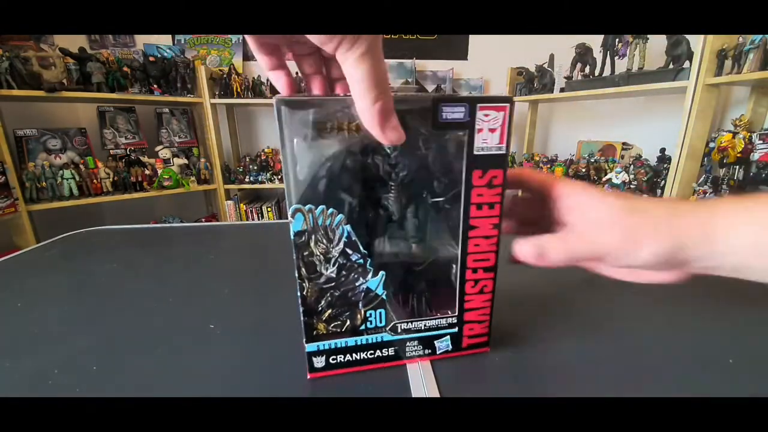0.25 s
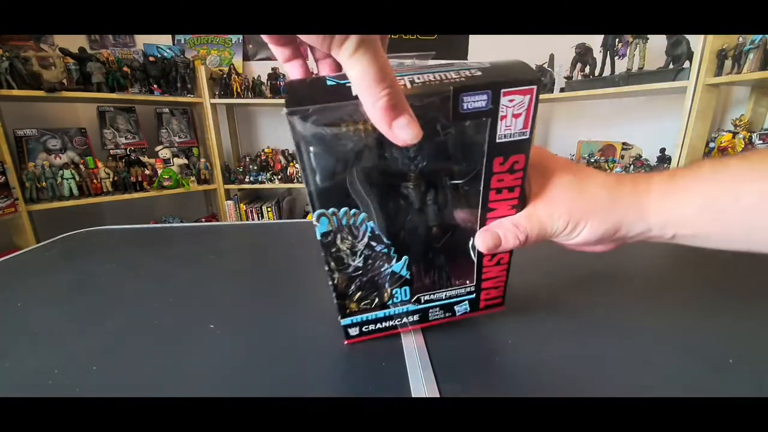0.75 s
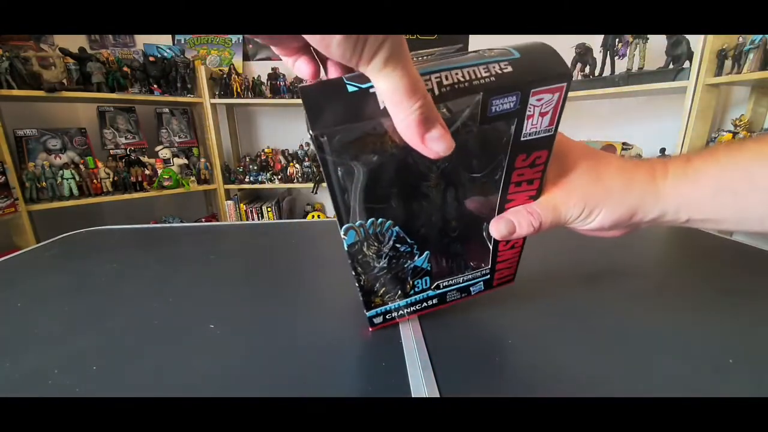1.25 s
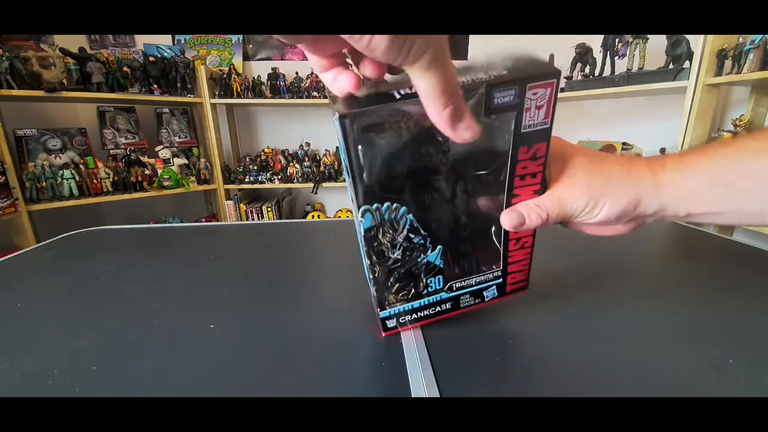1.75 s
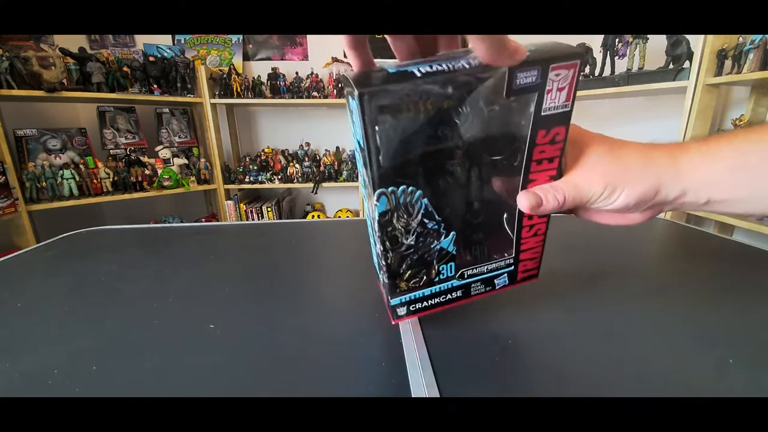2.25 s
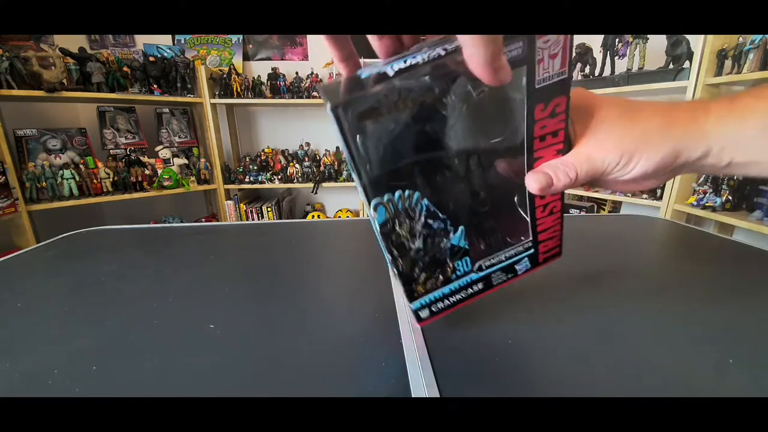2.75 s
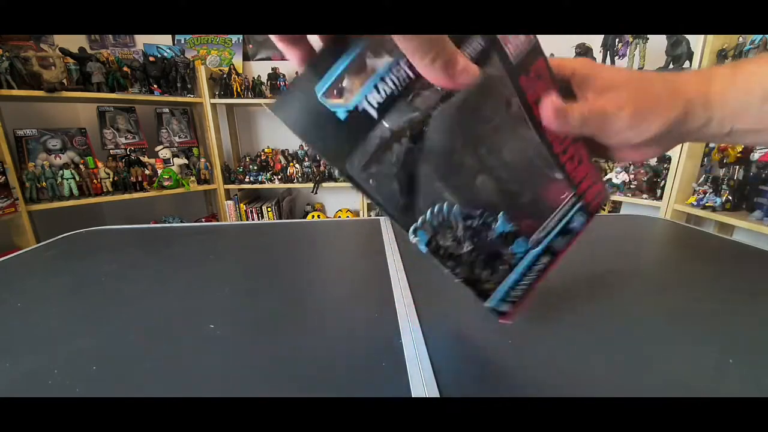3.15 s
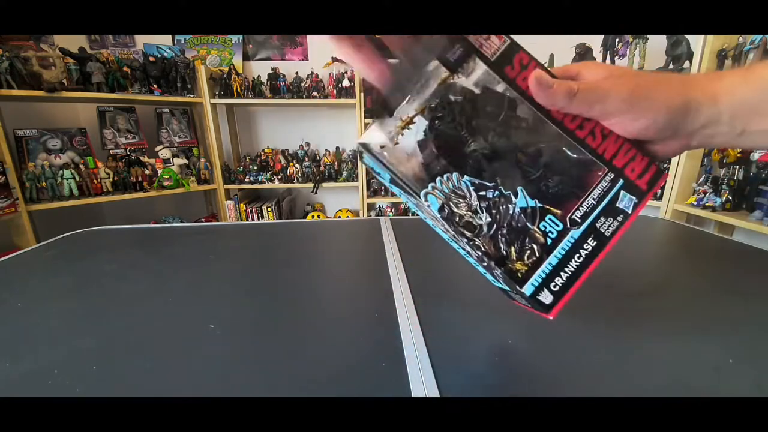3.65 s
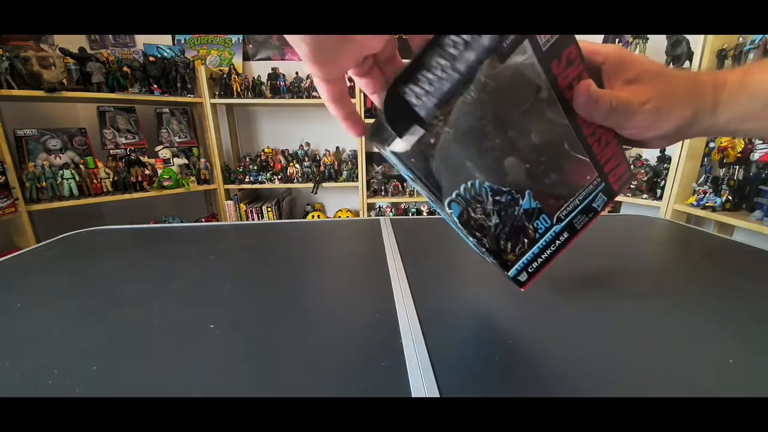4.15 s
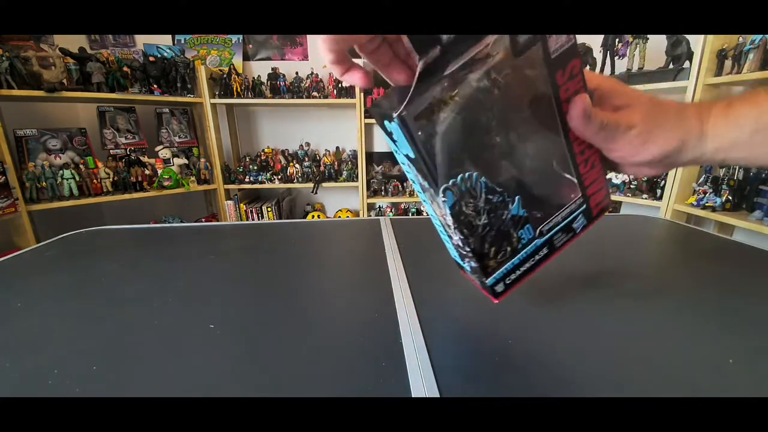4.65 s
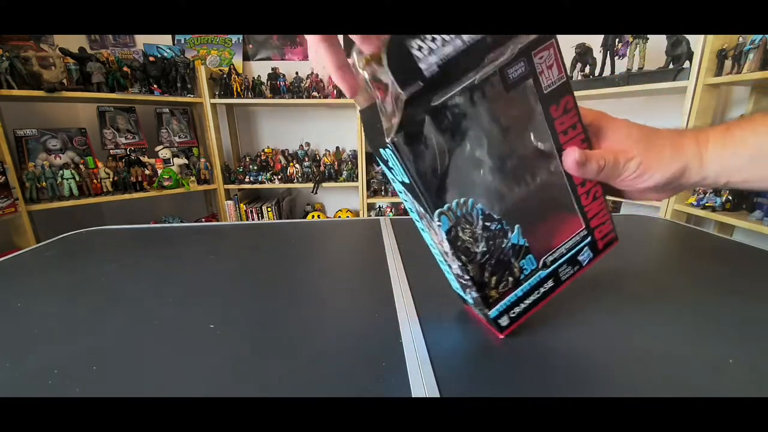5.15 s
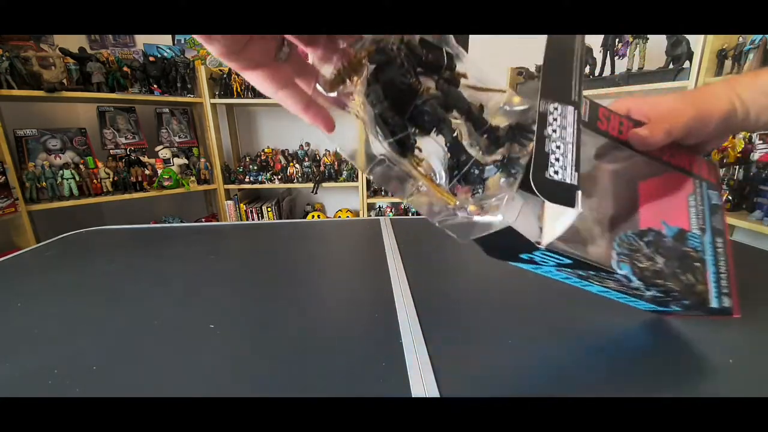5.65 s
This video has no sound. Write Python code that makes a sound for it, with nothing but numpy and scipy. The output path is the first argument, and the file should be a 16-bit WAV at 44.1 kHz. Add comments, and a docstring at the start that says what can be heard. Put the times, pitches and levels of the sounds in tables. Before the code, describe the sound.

A cardboard toy box with a plastic window is handled close by in a small room with a faint steady hush. For the first second and a half, fingers rub softly on the card, with light hollow knocks and a few tiny clinks. At about 1.6 seconds the lid flap catches with a loud knock and a short crunch. Quieter taps and rubbing follow. From about 3.1 to 3.5 seconds comes the loudest part, a quick run of snaps, crunches and plastic crackles as the flap drags through its slot and the tab flicks free. Between 3.7 and 5 seconds there are lighter scattered knocks and sharp plastic clicks as the flaps open. From about 5.1 seconds the plastic tray slides along the inside of the box with a soft, dry scrape and a small bump, fading by 5.8 seconds.

```python
"""Hollow knocks, dry rubbing and crunching jerks: a cardboard toy box with a plastic window is opened
over a table in a small room. Each contact excites the modes of the enclosed air, panels, flaps and plastic.
The lid flap drags from its slot by stick-slip friction and its tab flicks free; then the plastic tray
snaps past the flaps and scrapes out. Small hard contacts clink now and then over the room's faint rush."""
import sys
import numpy as np
from scipy import signal
from scipy.fft import rfft, irfft, next_fast_len
from scipy.io import wavfile
from scipy.ndimage import map_coordinates

SR = 44100
rng = np.random.default_rng(int(sys.argv[2]) if len(sys.argv) > 2 else 0)


def wav_out(sig):
    """Save sig, one row per channel (or a flat mono array), as 16-bit PCM at SR to the path in sys.argv[1]."""
    wavfile.write(sys.argv[1], SR, np.round(np.clip(np.atleast_2d(sig).T, -1, 1) * 32767).astype(np.int16))


N = 259308

# A contact's level is that of the panels; its hardness (plastic) and thump (air) are relative to it.
# knocks and snaps: (time [s], level [dB], hardness [dB], thump [dB], panel note [Hz])
KNOCKS = [(0.3577, -44, -25, -20, 466), (0.5783, -29.5, -39, -16, 538), (0.8661, -51.5, -10.5, -13, 526),
          (0.981, -49, -18.5, -8, 536), (1.1216, -53, 0.5, -20, 425), (1.251, -39.5, -2, -28.5, 840),
          (1.3508, -44, -21, -35, 480), (1.4354, -46.5, -29.5, -28, 526), (1.5447, -35.5, -21.5, -23, 533),
          (1.606, -20.5, -17.5, -10, 530), (1.7842, -35, -13, -8, 500), (1.8619, -37, -17.5, -10, 650),
          (2.3578, -46.5, -38.5, -11, 506), (2.5551, -42, -19.5, -14.5, 526),
          (2.6297, -37, -16.5, -12, 503), (2.7786, -43.5, -28, -7, 478), (3.0429, -42.5, -11, -3.5, 510),
          (3.0998, -36, -12, -27, 450), (3.1352, -38.5, -0.5, -15, 530), (3.156, -24, -11.5, -22.5, 530),
          (3.1903, -24.5, -26, -12, 580), (3.228, -19.5, -11.5, -13, 554), (3.2922, -20, -24, -13.5, 596),
          (3.3222, -25, -5, -19, 860), (3.4071, -17, -8.5, -21, 483), (3.7123, -42, -7.5, 8.5, 610),
          (3.7188, -35.5, -21, -16, 580), (3.7902, -50.5, -6.5, -22, 520), (3.824, -58, 0, -10, 700),
          (4.0287, -46.5, -15.5, -21, 566), (4.1027, -42, -18, -21.5, 526), (4.1759, -47.5, 4, -24, 730),
          (4.2909, -40.5, -18, -23, 600), (4.3332, -49, -17, -12, 547), (4.4129, -37.5, -29.5, -28, 502),
          (4.457, -38, -3.5, -26, 580), (4.4952, -31, 2.5, -19, 960), (4.5843, -38, -12, -30, 630),
          (4.6395, -34.5, -9, -21.5, 890), (4.7298, -26.5, -6, -22, 628), (4.7953, -51, -1, -27, 633),
          (4.8428, -34.5, 6, -11, 564), (4.9099, -38, -51, -31, 540), (5.0023, -37.5, -30, -0.5, 710),
          (5.019, -41, 6.5, 4, 750), (5.449, -48.5, -2.5, -33, 755), (5.5327, -52, -5, 0, 470),
          (5.7609, -58, -32.5, -14, 664)]
# short low and mid tones of the box, ringing under knocks and crunches or alone as soft bumps:
# (time [s], level [dB], note [Hz])
BOX_TONES = [(0.590, -37, 488), (0.837, -45, 550), (1.074, -47.5, 540), (1.237, -48, 555), (1.607, -32, 63),
             (1.615, -26.5, 366), (1.66, -36.5, 135), (1.972, -46, 128), (2.098, -54, 130.4),
             (2.372, -53.5, 578), (3.436, -36.5, 62), (3.411, -26, 800), (3.44, -31, 378),
             (3.47, -37.5, 230), (4.252, -46.5, 610), (4.718, -42, 760), (4.84, -38.5, 213),
             (5.003, -37, 123), (5.536, -32.5, 478)]
# card dragging and buckling: (time [s], level [dB], hardness [dB], thump [dB], flap note [Hz], length [s])
CRUNCHES = [(0.692, -42.5, -4.5, -7, 1650, 0.027), (1.623, -29, -10.5, -3.5, 1080, 0.035),
            (1.6488, -21, -7.5, -18.5, 1570, 0.042), (1.700, -25.5, -8.5, -12.5, 1555, 0.025),
            (2.6424, -37, -15, -11, 1120, 0.018), (3.2395, -28, 4, -32.5, 1080, 0.029),
            (3.2704, -27.5, -8, -11.5, 894, 0.029), (3.334, -32, 4, -10.5, 1910, 0.043),
            (3.411, -20.5, 3, -15.5, 2360, 0.033), (3.432, -19.5, -2.5, -7, 1420, 0.024),
            (3.453, -27, -8, -11.5, 1130, 0.0043)]
# fingers rubbing the card: (start [s], length [s], level [dB], hardness [dB], thump [dB])
STROKES = [(0.0, 0.19, -62, -31, -5), (0.155, 0.18, -54.5, -11.5, -10), (0.365, 0.082, -47.5, -11.5, -7),
           (0.483, 0.36, -50, -15, -10), (0.925, .36, -52.5, -12, -12), (1.395, 0.3, -50.5, -18, -25),
           (1.582, 0.25, -40.5, -7, -5.5), (1.93, 0.13, -60, -16.5, 8), (2.412, 0.056, -64, -18.5, -14),
           (2.608, 0.17, -50.5, -14, -4.5), (2.963, 0.11, -45, -14.5, -14), (3.104, 0.064, -36.5, -2, -12),
           (3.217, 0.13, -33.5, 2, -16), (3.63, 0.046, -65, 3, -15), (3.742, 0.08, -54, -6, -14),
           (3.97, 0.026, -50, -35, -1), (4.004, 0.42, -57, -8, -9), (4.43, 0.17, -56.5, 1, -13),
           (4.867, 0.24, -44.5, -29, -10), (5.265, .30, -59, 2, 1.5), (5.654, 0.11, -66, -7.5, 5)]
# envelope of the sliding tray: (time [s], level [dB])
TRAY_ENVELOPE = [(5.0, -66), (5.07, -56), (5.17, -42.5), (5.26, -44), (5.36, -42.5), (5.43, -70),
                 (5.5, -45.5), (5.601, -53), (5.688, -53.5), (5.78, -101)]
# light hard contacts: (time [s], level [dB])
CLINKS = [(0.142, -52), (0.23, -55), (0.378, -40), (0.488, -59), (4.108, -53), (4.122, -54.5),
          (4.178, -43.5)]
# how freely the flaps ring: (time [s], freedom [0 held, 1 free])
FLAP_FREEDOM = [(1.5, 0.066), (2.7, 0.0051), (3.2, 0.36), (3.42, 0.04), (3.75, 0.3), (4.3, 0.027),
                (4.48, 0.37), (4.85, .58), (5.05, 0.91), (5.45, 1), (5.6, 0.66), (5.75, 0.21)]

# modes of the box's parts and of what clinks: (frequency [Hz], bandwidth [Hz], gain [dB])
AIR_MODES = [(64, 55, 3), (118, 98, -5), (226, 170, 2)]
PANEL_MODES = [(360, 450, -8), (430.6, 27, -6), (509.8, 36, 2), (601, 110, -3.5), (712, 37, -9),
               (903, 410, -26.5)]
FLAP_MODES = [(882, 280, 2.5), (1133, 200, 8), (1536, 1300, 3), (2080, 110, -7), (2660, 170, -7)]
TAB_MODES = [(2410, 30, 0), (2663, 68, -1)]
CLINK_MODES = [(2255, 120, 7), (2500, 96, 8), (3010, 100, -5), (3850, 235, -4), (6120, 300, 1),
               (6920, 330, 5), (7100, 120, -15), (7760, 95, 8), (8940, 150, -1), (10800, 550, -7)]
# spectra of the thin plastic, tray scrape, reverberation and room noise: (frequency [Hz], gain [dB])
PLASTIC_SPECTRUM = [(1200, -26.5), (2700, 7), (3500, 6.5), (4300, 1.5), (5500, 1), (7500, -3),
                    (9500, -10.5), (12500, -21), (16000, -29.5)]
SCRAPE_SPECTRUM = [(150, -35.5), (300, -17), (550, 2.5), (750, -2), (1000, -0.5), (1350, -2), (1800, -9.5),
                   (2500, -19.5), (3550, -14), (4300, -24.5), (7000, -27.5), (10000, -30.5), (16000, -54)]
REVERB_SPECTRUM = [(100, -2), (500, -4), (2000, 3.53), (6000, 3.5), (14000, 3.5)]
BACKGROUND_SPECTRUM = [(20, -20), (60, 0), (150, -8.5), (330, -6.5), (510, 5), (900, -10.5), (1800, -23.5),
                       (4000, -32.5), (7000, -20), (11000, -25.5), (16000, -30)]
# reverberation time of the room: (frequency [Hz], time to fall 60 dB [s])
REVERB_TIMES = [(100, .42), (500, .37), (1800, .3), (5000, .27), (10000, .27), (15000, .26)]

PARTS = 4  # enclosed air, panels, flaps, plastic, in that order
HIT_SAMPLES = 8192
FLAP_HELD_DB, FLAP_FREE_DB = -2.5, 10.5  # flaps over panels, at 0 dB hardness
TAUT_TILT_DB, SLACK_TILT_DB = 5.5, -3  # plastic's treble per octave, box shut and open, at 0 dB hardness
FLAP_PER_HARD, TILT_PER_HARD = 0.43, 0.17  # flap level [dB] and tilt [dB/octave] per dB of hardness


def knocks():
    """Snap-through: a panel pops with an impulse that fills the room, and a brief chatter close by."""
    out, t = np.zeros(N), np.arange(HIT_SAMPLES) / SR
    push = np.tile(signal.unit_impulse(HIT_SAMPLES), (PARTS, 1))
    decay_s = np.array([[.008], [.004], [.003], [.0026]])
    chatter = np.exp(-t / decay_s) * (1 - np.exp(-t / 0.00097))
    for s, db, hard_db, thump_db, panel_hz in KNOCKS:
        levels, tilt_db = coupling(s, db, hard_db, thump_db)
        flap_hz = 2.15 * panel_hz
        forces = push * [[28], [12], [6], [.6]] + chatter * rng.standard_normal((PARTS, HIT_SAMPLES))
        add(out, s, strike(forces, levels, tilt_db, panel_hz, flap_hz))
        add(out, s, amp(1.5) * reverberation(strike(push, levels, tilt_db, panel_hz, flap_hz)))
    return out


def coupling(s, db, hard_db, thump_db):
    """Coupling: harder contacts reach stiffer parts; opening frees the flaps and slackens the plastic."""
    free = np.interp(s, *np.transpose(FLAP_FREEDOM))
    flap_db = FLAP_HELD_DB + free * (FLAP_FREE_DB - FLAP_HELD_DB) + FLAP_PER_HARD * hard_db
    tilt_db = TAUT_TILT_DB + free * (SLACK_TILT_DB - TAUT_TILT_DB) + TILT_PER_HARD * hard_db
    return db + np.array([thump_db, 0, flap_db, hard_db]), tilt_db


def strike(forces, levels, tilt_db, panel_hz, flap_hz, flap_q=2):
    """Superposition: all parts of the box answer one blow, each at its own level."""
    air, panel, flap, sheet = box(forces, tilt_db)
    panel = struck_spot(panel, panel_hz, q=7.2, boost=2.5)
    flap = struck_spot(flap, flap_hz, flap_q, boost=4.4)
    return sum(amp(db) * fixed_energy(part) for db, part in zip(levels, (air, panel, flap, sheet)))


def struck_spot(x, hz, q, boost):
    """Selective excitation: the point of impact brings out the modes near one note."""
    return x + boost * signal.lfilter(*signal.iirpeak(hz, q, fs=SR), x)


def box(forces, tilt_db):
    """Forced vibration: air, large panels, stiff flaps and plastic each filter their own force."""
    air, panel, flap, sheet = forces
    return [resonate(air, AIR_MODES), resonate(panel, PANEL_MODES),
            resonate(flap, FLAP_MODES), plastic(sheet, tilt_db)]


def plastic(force, tilt_db):
    """Modal overlap: the dense modes of thin plastic merge into a smooth minimum-phase response."""
    def response(hz):
        treble_octaves = np.log2(np.maximum(hz, 3000) / 3000)
        gain = amp(along(PLASTIC_SPECTRUM, hz) + tilt_db * treble_octaves)
        cepstrum = irfft(np.log(gain))
        half = len(cepstrum) // 2
        causal_fold = np.r_[1, np.full(half - 1, 2), np.zeros(half)]
        return np.exp(rfft(cepstrum * causal_fold))
    return filtered(force, response)


def box_tones():
    """Damped oscillation: one low or mid mode of the box swells and dies within a few cycles."""
    out, t = np.zeros(N), np.arange(HIT_SAMPLES) / SR
    for s, db, hz in BOX_TONES:
        cycles = hz * t
        ring = np.sin(2 * np.pi * cycles) * np.exp(-cycles / 3.7) * (1 - np.exp(-cycles / 2.0))
        add(out, s, in_room(amp(db) * fixed_energy(ring), wet_db=-0.5))
    return out


def crunches():
    """Stick-slip: the lid flap catches, then drags through its slot in a short dense run of slips."""
    out, t = np.zeros(N), np.arange(HIT_SAMPLES) / SR
    for s, db, hard_db, thump_db, flap_hz, length in CRUNCHES:
        levels, tilt_db = coupling(s, db, hard_db, thump_db)
        levels += [0, 0, 5, 0]  # the dragging flap is driven harder
        envelope = np.exp(-(t / length) ** 2) + .4 * np.exp(-t / 0.013)
        force = slips(HIT_SAMPLES, per_s=4900, spread_db=4.0) * envelope
        crunch = strike([force] * PARTS, levels, tilt_db, panel_hz=620, flap_hz=flap_hz, flap_q=7)
        add(out, s, in_room(crunch, wet_db=-8))
    return out


def tab(s=3.408, db=-19):
    """Free vibration: the lid's stiff tab rings briefly as it flicks out of its slot."""
    out = np.zeros(N)
    ring = fixed_energy(resonate(signal.unit_impulse(HIT_SAMPLES), TAB_MODES))
    add(out, s, in_room(amp(db) * ring, wet_db=-5))
    return out


def rubbing(rise_s=0.018, release_s=0.053):
    """Sliding friction: fingers drag over the card, and fine and coarse slips shake the box."""
    t, drive = np.arange(N) / SR, np.zeros((PARTS, N))
    for s, length, db, hard_db, thump_db in STROKES:
        levels, _ = coupling(s, db, hard_db, thump_db)
        press = np.clip((t - s) / rise_s, 0, 1) * np.exp(-np.maximum(t - s - length, 0) / release_s)
        drive = np.maximum(drive, amp(levels)[:, None] * press)
    grip = amp(np.minimum(3 * wobble(45) - 3.5, 1))  # comes and goes, mostly below full pressure
    fine, coarse = slips(N, per_s=6000, spread_db=1.5), slips(N, per_s=100, spread_db=1.8)
    parts = box([fine + share * coarse for share in [0.35, 0.37, 0.45, .5]], tilt_db=2.5)
    rub = grip * sum(gain * unit_rms(part) for gain, part in zip(drive, parts))
    return in_room(rub, wet_db=-1.5)[:N]


def tray():
    """Sliding friction: the plastic tray's edge scrapes along the inside of the box, catching lightly."""
    pressure = amp(2.0 * wobble(35))
    fine, catches = slips(N, per_s=2700, spread_db=-1.0), slips(N, per_s=130, spread_db=-2.0)
    scrape = coloured(pressure * (fine + 0.36 * catches), SCRAPE_SPECTRUM)
    level_db = np.interp(np.arange(N) / SR, *np.transpose(TRAY_ENVELOPE), left=-np.inf, right=-np.inf)
    return in_room(amp(level_db) * scrape, wet_db=1.5)[:N]


def clinks():
    """Impulse response: small hard contacts excite treble modes that die quickly."""
    out = np.zeros(N)
    ring = fixed_energy(resonate(signal.unit_impulse(HIT_SAMPLES), CLINK_MODES))
    for s, db in CLINKS:
        add(out, s, in_room(amp(db) * ring, wet_db=5.0))
    return out


def in_room(x, wet_db):
    """Energy balance: the direct and reverberant fields share the sound's energy."""
    out = amp(wet_db) * reverberation(x)
    out[:len(x)] += x
    return out / np.hypot(1, amp(wet_db))


def reverberation(x):
    """Diffuse reflection: table and shelves answer within milliseconds, then decay exponentially."""
    hz, t, noise = signal.stft(rng.standard_normal(SR // 2), SR, nperseg=256)
    fade_db = along(REVERB_SPECTRUM, hz)[:, None] - 60 * t / along(REVERB_TIMES, hz)[:, None]
    tail = signal.istft(noise * amp(fade_db), SR, nperseg=256)[1]
    tail *= np.clip((np.arange(len(tail)) / SR - .002) / 0.0028, 0, 1)
    return signal.fftconvolve(x, tail / np.linalg.norm(tail))


def background():
    """Stationary noise: the faint steady rush of the room."""
    return amp(-68.0) * coloured(rng.standard_normal(N), BACKGROUND_SPECTRUM)


def resonate(x, modes):
    """Modal summation: damped resonators in parallel, rolled off outside their range."""
    def response(f):
        return sum(amp(db) * 1j * f * width / (hz * hz - f * f + 1j * f * width)
                   for hz, width, db in modes)
    edges_hz = [modes[0][0] * 0.75, min(modes[-1][0] * 0.88, SR / 2 - 1)]
    return signal.sosfilt(signal.butter(2, edges_hz, 'band', fs=SR, output='sos'), filtered(x, response))


def slips(count, per_s, spread_db):
    """Poisson process: tiny stick-slip releases of uneven size at random moments."""
    released = rng.random(count) < per_s / SR
    return unit_rms(released * rng.standard_normal(count) * amp(spread_db * rng.standard_normal(count)))


def wobble(knots_per_s):
    """Spline interpolation: a smooth curve through random knots."""
    knots = rng.standard_normal(int(N * knots_per_s / SR) + 4)
    return map_coordinates(knots, [np.arange(N) * knots_per_s / SR])


def coloured(x, spectrum):
    """Spectral shaping by (frequency [Hz], gain [dB]) points, scaled to rms 1."""
    return unit_rms(filtered(x, lambda hz: amp(along(spectrum, hz))))


def filtered(x, response):
    """Linear filtering: the spectrum of x times a complex frequency response."""
    size = 2 * next_fast_len(len(x) // 2 + HIT_SAMPLES)
    return irfft(rfft(x, size) * response(np.fft.rfftfreq(size, 1 / SR)), size)[:len(x)]


def along(points, hz):
    """Interpolation of (frequency [Hz], value) points on a logarithmic axis."""
    frequencies, values = np.transpose(points)
    return np.interp(np.log(hz + 1), np.log(frequencies + 1), values)


def amp(db):
    """Decibels as an amplitude ratio."""
    return 10 ** (np.asarray(db) / 20)


def unit_rms(x):
    """Power normalisation to rms 1."""
    return x / np.sqrt(np.mean(x ** 2) + 1e-20)


def fixed_energy(x):
    """Energy normalisation to that of 10 ms at rms 1."""
    return x * np.sqrt(SR / 100 / (np.sum(x ** 2) + 1e-20))


def add(track, s, x):
    """Superposition of x on the track at time s."""
    remainder = track[max(round(s * SR), 0):]
    remainder[:len(x)] += x[:len(remainder)]


def scene():
    """Superposition: all the handling of the box over the quiet room, in one channel."""
    return (knocks() + box_tones() + crunches() + tab() + rubbing() + tray() + clinks()
            + background())[None]


def record(dry):
    """Band limiting: the deepest bass is thinned and the highest treble is cut off steeply."""
    low_hz, top_hz = 32, 15600
    thinned = signal.sosfilt(signal.butter(2, low_hz, 'high', fs=SR, output='sos'), dry)
    return np.array([filtered(channel, lambda hz: 1 / np.sqrt(1 + (hz / top_hz) ** 200))
                     for channel in thinned])


dry = scene()
out = record(dry)
wav_out(out)
```